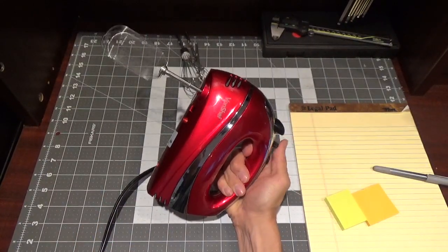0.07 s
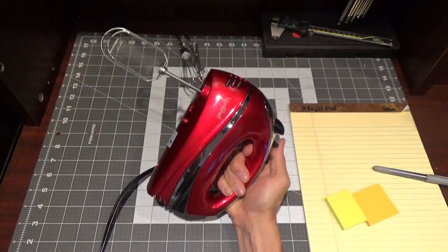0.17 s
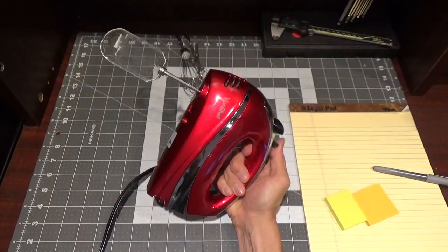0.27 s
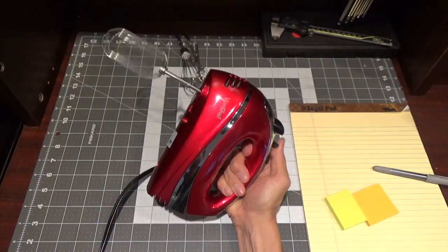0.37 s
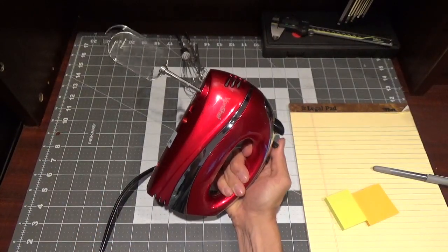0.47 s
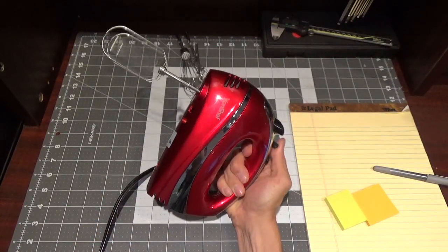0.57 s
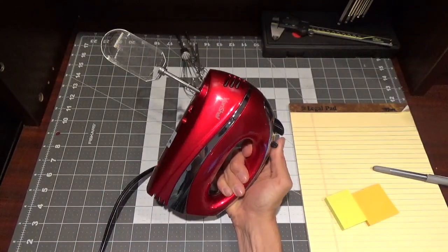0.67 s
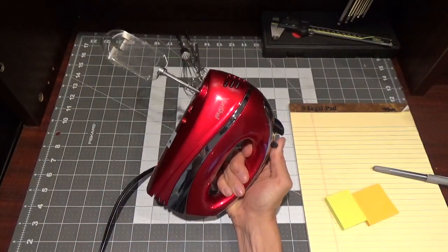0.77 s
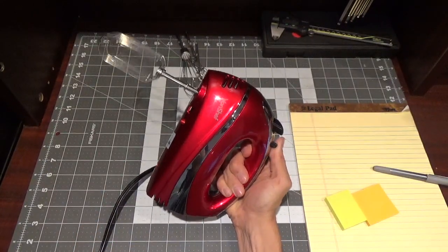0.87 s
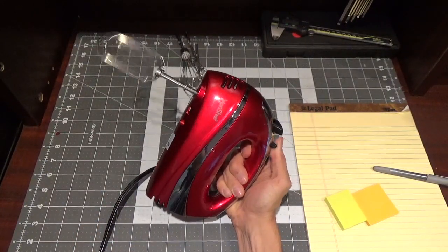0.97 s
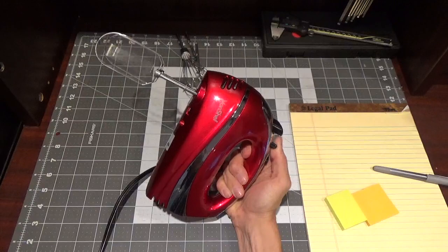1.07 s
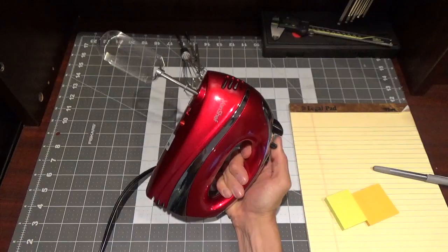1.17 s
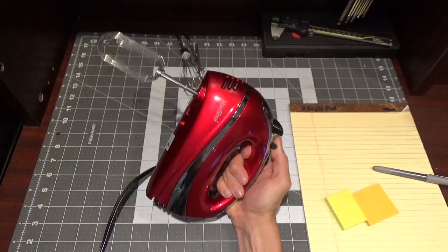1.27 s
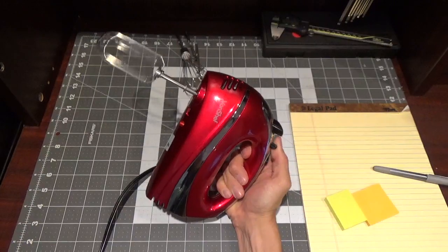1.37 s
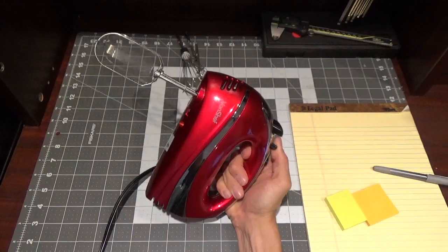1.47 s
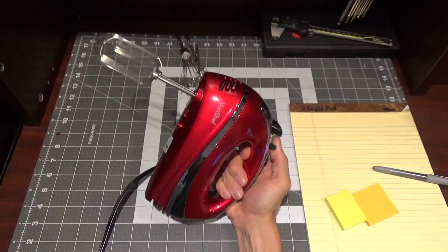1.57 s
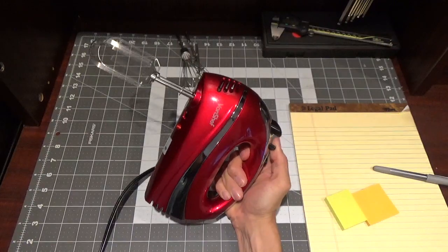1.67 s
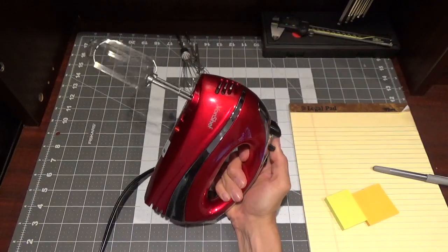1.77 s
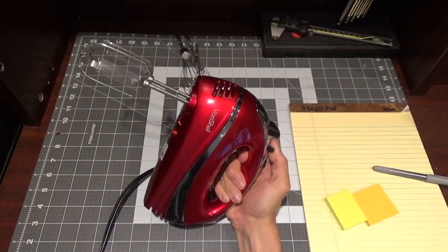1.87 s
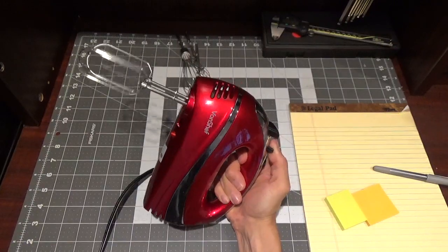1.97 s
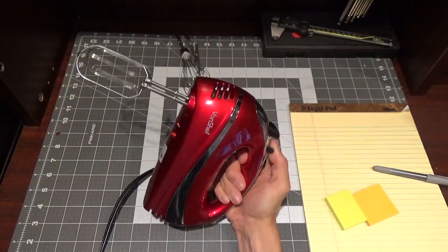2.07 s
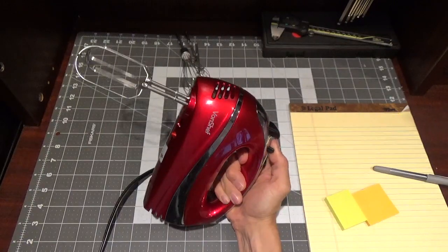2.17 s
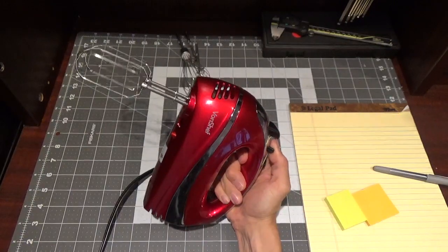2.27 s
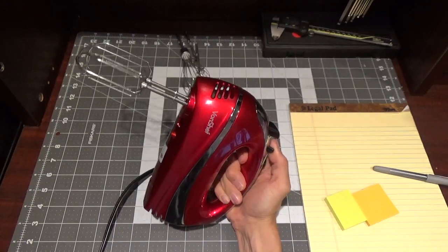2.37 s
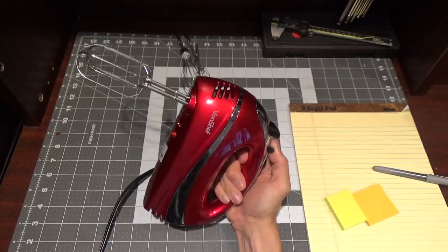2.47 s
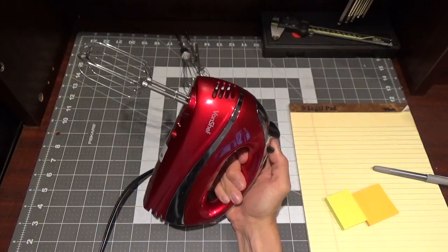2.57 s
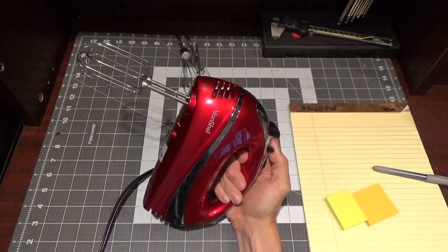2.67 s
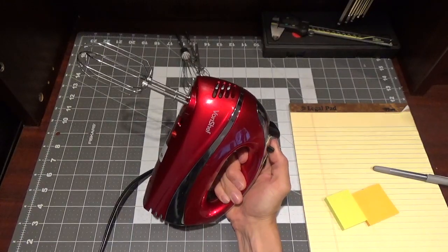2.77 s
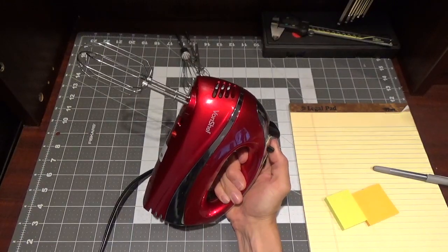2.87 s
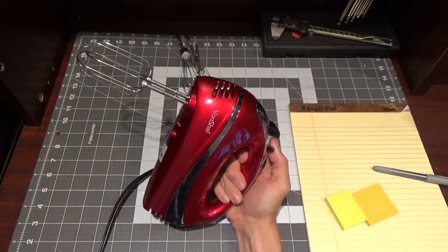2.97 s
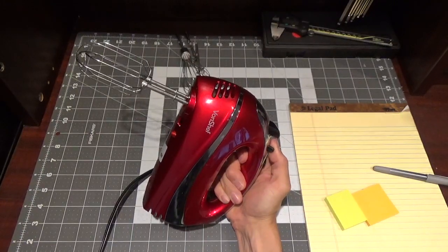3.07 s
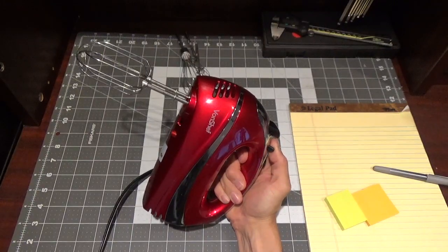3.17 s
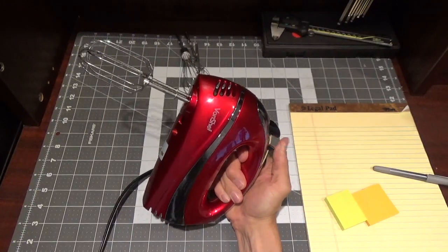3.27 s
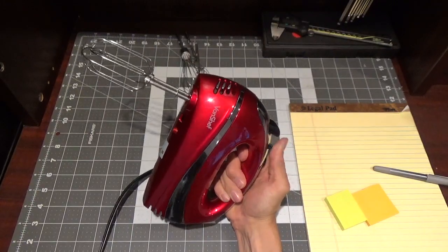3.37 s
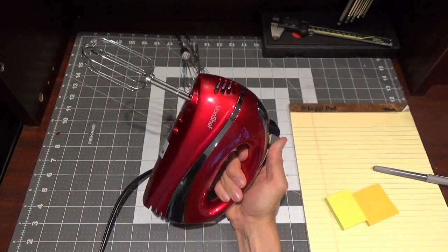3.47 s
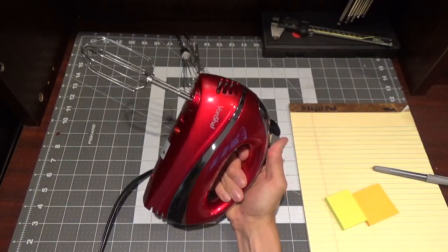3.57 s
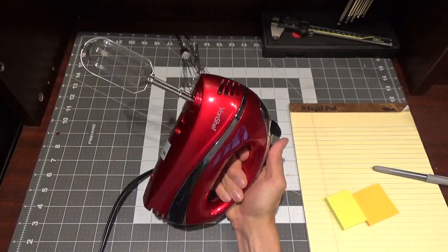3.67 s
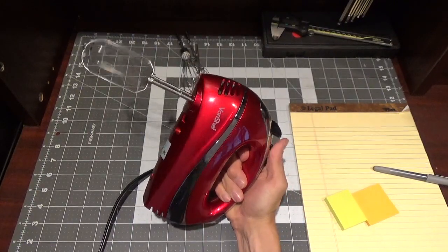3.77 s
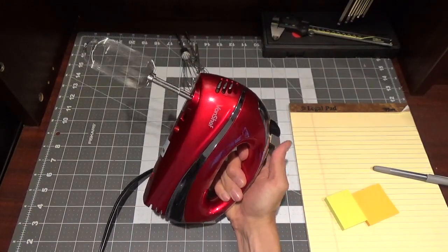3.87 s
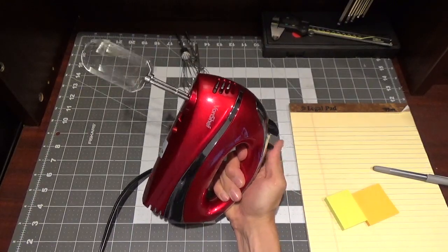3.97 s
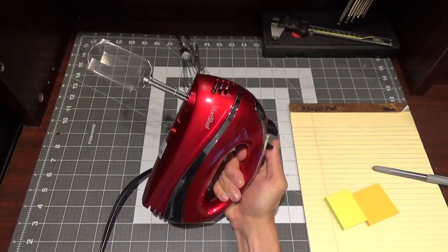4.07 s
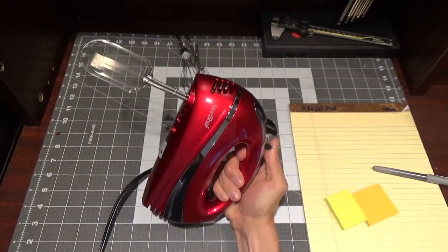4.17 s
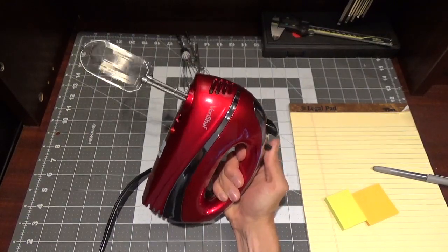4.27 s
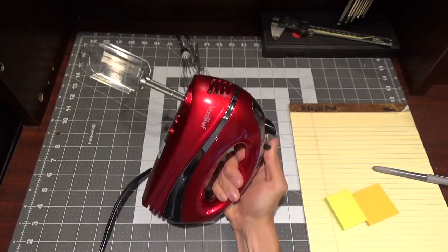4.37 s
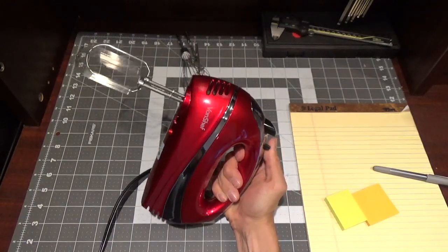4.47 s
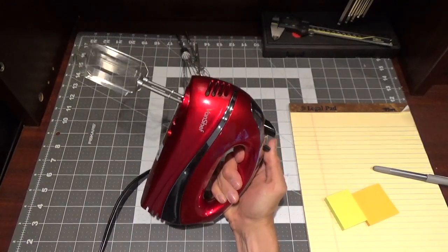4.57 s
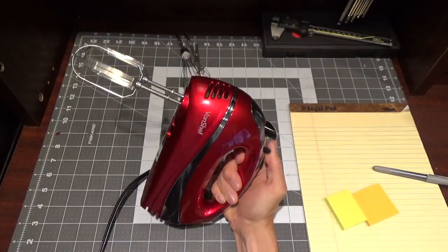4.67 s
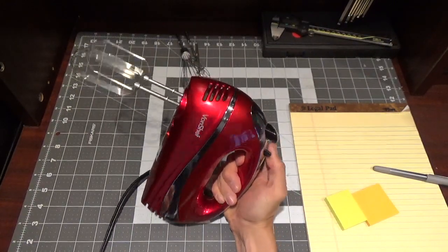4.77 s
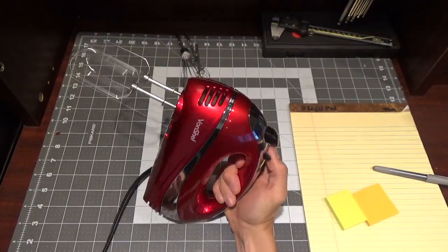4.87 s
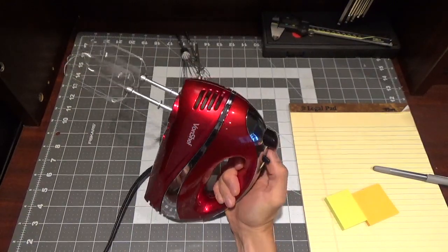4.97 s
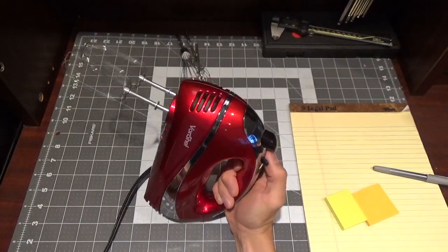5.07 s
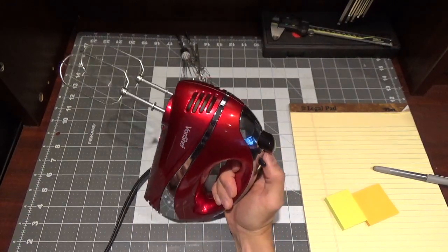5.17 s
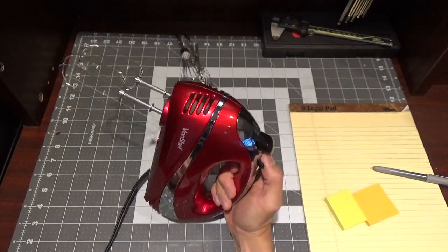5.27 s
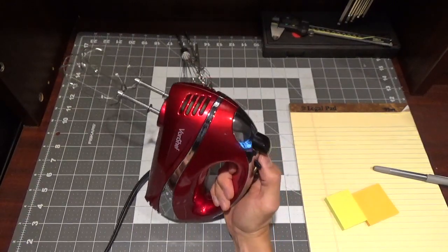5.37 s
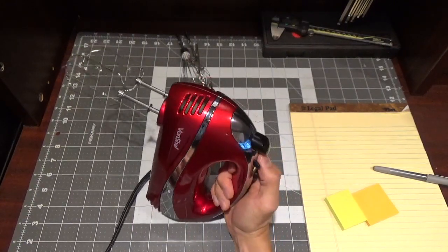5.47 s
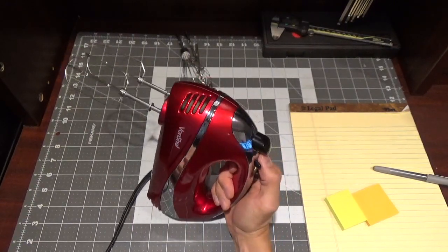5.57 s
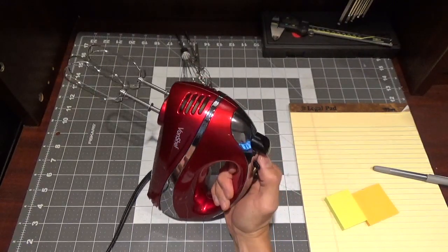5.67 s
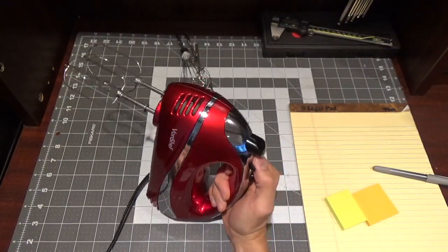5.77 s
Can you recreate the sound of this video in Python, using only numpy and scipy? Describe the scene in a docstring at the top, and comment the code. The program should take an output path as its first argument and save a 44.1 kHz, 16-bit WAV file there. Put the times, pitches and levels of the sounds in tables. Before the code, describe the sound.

A handheld electric mixer whirs at full speed, clicks off and whines down to rest, then is briefly switched on and coasts down again.

```python
"""In a small room, a hand-held kitchen mixer runs at full speed close to the microphone, is switched off and
coasts to rest; later it is switched on for half a second and coasts down again. Commutator and fan whine at
multiples of the rotor speed, the worm gear rattles the plastic housing, air rushes through the vents, brushes
scrape over the bars, and the wire beaters touch and ring. Noise, hum and faint ticking fill the background."""
import sys
import numpy as np
from scipy import signal
from scipy.fft import rfft, irfft, next_fast_len
from scipy.io import wavfile

SR = 44100
rng = np.random.default_rng(int(sys.argv[2]) if len(sys.argv) > 2 else 0)


def voltage_ratio(level):
    """Linear amplitude factor for a level in decibels (scalar or array-like)."""
    return 10 ** (np.asarray(level, float) / 20)


def wav_record(signal):
    """Record a signal, one row per channel, as 16-bit PCM in the file named by sys.argv[1]."""
    frames = np.transpose(np.atleast_2d(signal))
    bounded = np.clip(frames, -1, 1)
    # unit amplitude maps onto the largest positive 16-bit level
    quanta = np.round(bounded * 32767).astype(np.int16)
    wavfile.write(sys.argv[1], SR, quanta)


N = 257226
SIZE = next_fast_len(N + SR)  # transform length, with space for tails
HZ = np.arange(SIZE // 2 + 1) * SR / SIZE + 1e-3
TIME = np.arange(N) / SR  # seconds

MAINS_HZ = 60
SLOTS, FULL_SPEED = 12, 250  # rotor slots; reference speed in turns per s
REGRIP_S = 3.2  # the grip has changed from here on
START_SPEED, PULL_RISE_S = 248.35, .0368  # turns per s; time constant with which the pull builds up
PULL_HALVED_AT, PULL_FALL = 106.92, 2.1625  # turns per s; steepness of the fall with speed
FRICTION, DRAG, DRAG_POWER = 66.305, 3.1731, .6123  # braking in turns per s2 = friction + drag * speed ** power
STEP_S = .002  # step of the motion
GROWL_DB, GROWL_STEEP = -23, 7  # level at the strongest pull; how fast it fades as the pull eases
STRAIN_BLUR_DB = 4.5  # the whine loses this much at the strongest pull
SEATED_DB = 7.5  # pull takes up the play of the gear, which then rattles less
HUM_DB, HUM_STEEP = -33.5, 0.99  # level at a pull share of 1; exponent of the share
HUM_ENDS_S, HUM_FADE_S = 4.12, .02  # the thumb moves on from the low setting
SCRAPE_LATER_DB = 3.5  # the brush side turns towards the microphone
GRAZE_PER_S, GRAZE_DB = 50, -41  # GRAZE_DB is relative to the hiss level
TICK_PER_S, TICK_HZ, TICK_DB = 30, 3430, -58
ROOM_T60_S, ROOM_DB = 0.091, -9  # decay before the loss of treble; level
WALL_CUT_HZ = 12000  # treble corner of one round of 25 ms; shorter rounds cut higher
TOP_HZ = 11300

# Spectrum of the room noise. Each row: frequency in Hz, density in dB per Hz.
ROOM_NOISE = [(18, -30), (30, -3), (114, -6), (166, 0.5), (316, -2.5), (1060, -8.5), (1400, -5.5),
              (1930, -12), (3410, -12.5), (3760, -15.5), (10400, -22.5), (11200, -30.5), (14600, -68.5),
              (22000, -120)]
# Level of the room noise in dB.
ROOM_NOISE_DB = -60.5
# Mains hum in the room. Each row: frequency in Hz, level in dB rms.
ROOM_HUM = [(60, -71), (120, -70.5), (240, -73.5)]
# Balance of the mixer. Each row: time in seconds, left minus right in dB.
BALANCE = [(0.0, 2), (0.8, 1), (2.43, 0.5), (3.04, 1), (3.49, 0.5), (5.83, 1.5)]
# Spectrum of the rumble in the grip. Each row: frequency in Hz, density in dB per Hz.
RUMBLE = [(15, -69.5), (40, -30.5), (70, -9.5), (110, 0.5), (200, -18.5), (320, -3), (500, -14.5)]
# Shifts of the mixer in the hand. Each row: centre in seconds, level in dB, length in seconds.
SHIFTS = [(.69, -44, 0.069), (0.968, -35, 0.07), (1.174, -29.5, 0.049), (1.3, -31, 0.12),
          (4.095, -30, 0.038), (4.216, -40, 0.068), (4.438, -44, 0.042), (4.557, -32, 0.037),
          (5.805, -65, 0.038)]
# Short bursts: clicks of the speed switch, and at 3.624 s a fainter noise just ahead of a loud click.
# Each row: start in seconds, peak in dB, length in ms, tilt in dB per octave.
BURSTS = [(0.662, -15.5, 5, 10), (3.248, -53.5, 55, -4), (3.28, -49, 30, -2), (3.292, -41, 31, -4),
          (3.624, -22, 57, -4.5), (3.632, -8.5, 9.2, 5), (3.699, -12, 20.6, -4.5), (4.079, -11.5, 18, -1.5),
          (4.104, -6.5, 7, 1.5), (4.193, -6, 4.3, 0), (4.532, -10.5, 26, 0.5), (5.65, -37, 21, 1),
          (5.788, -40, 20, -14.5)]
# Resonances of the switch plastic. Each row: frequency in Hz, width in Hz, level in dB.
SWITCH_BODY = [(334, 48, -36), (460, 77, -6.5), (960, 106, 3.5), (1940, 250, 4), (2750, 210, 5.5),
               (3180, 270, 1.5), (3750, 170, 2.5), (4700, 210, 2.5), (5700, 400, -0.5), (7540, 800, -2),
               (8260, 300, -1), (10240, 730, 1.5), (10100, 370, -25)]
# Modes of the wire beaters. Each row: frequency in Hz, level in dB, decay by 60 dB in seconds.
WIRE_MODES = [(3713, -12, .2), (4942, -11, .25), (5930, -10, .14), (8392, -1, .13), (8630, -9, .12),
              (9160, -11, .1), (9985, -3, .18), (10370, -11, .15), (10540, -11, .15)]
# Beaters touching. Each row: time in seconds, peak in dB.
TOUCHES = [(0.383, -29), (.8, -32), (1.128, -15.5), (1.25, -16.5), (1.384, -23), (1.47, -25), (1.64, -52),
           (4.078, -22), (4.4, -23), (4.532, -22)]
# Spectrum of the vent rush. Each row: frequency in Hz, density in dB per Hz.
RUSH = [(150, -20.5), (400, -7.5), (800, -6.5), (1200, -7), (1600, -1.5), (2100, 2), (2700, -7), (4000, -7),
        (7000, -16.5), (11500, -33)]
# Spectrum of the brush hiss. Each row: frequency in Hz, density in dB per Hz.
HISS = [(1500, -16.5), (3000, 6), (4300, 4), (5200, 6), (6300, -4), (7500, -5.5), (9000, 5), (10500, 0.5),
        (11500, -3.5)]
# Resonances of the shell under the gear rattle. Each row: frequency in Hz, width in Hz, level in dB.
SHELL = [(214, 8.3, -8), (312, 35, -6.5), (389, 35, -13.5), (478, 28, 3), (575, 40, -1), (635, 35, -2),
         (1060, 70, -2), (1295, 60, -4), (1465, 86, -7.5), (1664, 12, -15), (1908, 13, -7), (2120, 17, -42)]
# Resonances of the brushes scraping over the bars. Each row: frequency in Hz, width in Hz, level in dB.
SCRAPE = [(6260, 340, 4.5), (6390, 1300, 2), (7280, 1260, -2.5), (10300, 280, -9.5)]
# Spectrum of the growl under load. Each row: frequency in Hz, density in dB per Hz.
GROWL = [(250, -31), (550, 0), (1000, 2), (1700, -4), (3000, -7.5), (5000, -21), (11000, -30)]
# Paths out through the housing. Each row: frequency in Hz, width in Hz, dB as first held, dB as held later.
HOUSING_PATHS = [(530, 580, 0, -4), (1090, 97, -3, 1.5), (1630, 82, -5.5, -1.5), (2090, 220, -2.5, -1.5),
                 (2534, 76, -0.5, -3), (2706, 138, -2.5, 4), (3280, 350, -7, 1), (3760, 80, -13, -8.5),
                 (4225, 200, -1.5, 0), (4990, 150, -15.5, -5), (5314, 40, 0.5, -7.5), (5505, 150, -13.5, 1),
                 (5813, 100, 2, 0), (6097, 316, -0.5, -3), (6500, 320, -14, -11), (7000, 120, -6, 0.5),
                 (7310, 400, 1.5, -3), (7820, 150, -4.5, 1), (8270, 130, -0.5, 1.5), (8610, 110, -8, -2),
                 (9190, 550, 0.5, 1.5), (9820, 140, 6.5, 2), (10180, 225, -10, 5)]
# Slot whine under power, by its pitch. Each row: frequency in Hz, level in dB.
SLOT_WHINE = [(300, -67), (500, -34), (720, -30.5), (950, -22), (1250, -31), (1500, -25), (1720, -30.5),
              (1900, -41.5), (2150, -29), (2330, -37), (2500, -39.5), (3100, -35.5)]
# Whine partials as multiples of the rotor speed (10 fan blades, 12 slots).
MULTIPLES = [1, 5, 10, 24, 31, 36, 40, 42, 48, 53, 55, 60, 65, 72, 84, 96, 108, 120, 132, 144, 156, 168,
             180, 192]
# Strength of each multiple. Each row: dB at the reference speed, dB lost per halving of speed.
STRENGTHS = [(3, 13.5), (-29.5, 4.5), (-2, 9), (-6.5, 3.5), (-22.5, 11.5), (-3.5, -1), (-28.5, -0.5),
             (-37.5, 0.5), (-2.5, 0.5), (-18.5, 4), (-40, 15.2), (-6.5, -0.5), (-35, 5), (-1.5, 3), (-8, 2),
             (-11.5, 1.5), (-12.5, 1), (-12.5, 0), (-21, -3.5), (-18, 2), (-20, -1), (-29, -4), (-42, -4),
             (-27, 4)]
# Current flows. Each row: on in seconds, off in seconds, pull at standstill in turns per s2.
POWER_ON = [(-1, .66, 1295.9), (3.6205, 4.19, 1386.4)]
# Layer levels by rotor speed. Each row: speed in turns per s, then whine, gear rattle, vent rush, brush hiss
# and rumble in the hand, each in dB.
BY_SPEED = [(0, -79, -88, -82, -84, -67.5), (8, -66, -66.5, -63.5, -62.5, -57),
            (22.5, -40, -66, -54.5, -55, -57), (34.2, -36.5, -55.5, -48, -47.5, -64),
            (46.7, -33, -48, -47, -42.5, -51), (62.3, -28, -42, -47.5, -36.5, -57),
            (94.4, -22.5, -37.5, -36.5, -39, -52.5), (122.7, -21.5, -33, -33.5, -34.5, -49),
            (153.3, -18.5, -31, -27.5, -28.5, -47), (195, -19, -29, -19.5, -24.5, -50),
            (232, -15, -29, -19, -18, -53.5), (281, -16.5, -26.5, -18.5, -19, -60)]
# Change in dB of the same five layers as held later.
LATER_GRIP_DB = [-2.5, -1, -2, -2, 5.5]


def rms_one(x):
    """Normalization: the mean power becomes one."""
    return x / np.sqrt(np.mean(x ** 2) + 1e-20)


def in_time(rows):
    """Linear interpolation of every column over the time in the first."""
    s, *columns = np.transpose(rows)
    return [np.interp(TIME, s, column) for column in columns]


def through(x, response):
    """Linear filtering: the spectrum is multiplied by the frequency response."""
    return irfft(rfft(x, SIZE) * response, SIZE)[..., :N]


def colour(points):
    """Spectral envelope: decibels joined by straight lines over log frequency."""
    hz, db = np.transpose(points)
    return voltage_ratio(np.interp(np.log(HZ), np.log(hz), db))


def resonances(modes, sign=-1):
    """Parallel resonators, each of its listed peak gain; alternating signs fill valleys, equal signs leave nulls."""
    total = 0
    for k, (hz, wide, db) in enumerate(modes):
        damping = 1j * HZ * wide
        total = total + sign ** k * voltage_ratio(db) * damping / (hz ** 2 - HZ ** 2 + damping)
    return total


def drift(rate):
    """Slow random modulation: normal deviates, `rate` per second, joined by lines."""
    knots = rng.standard_normal(600)
    return np.interp(TIME * rate, np.arange(len(knots)), knots)


def noise(response, patchy_db=4.5):
    """Filtered white noise brought to rms 1, then given a flickering level."""
    return rms_one(through(rng.standard_normal(N), response)) * voltage_ratio(patchy_db * drift(12))


def ring(clicks, hz, t60):
    """Damped oscillator: a pole pair answers each click with a decaying sine."""
    radius, angle = voltage_ratio(-60 / (t60 * SR)), 2 * np.pi * hz / SR
    return signal.lfilter([0, np.sin(angle)], [1, -2 * radius * np.cos(angle), radius ** 2], clicks + 1e-18)


def background():
    """Superposition of partly correlated stereo noise, wavering mains harmonics and regular resonant ticks."""
    middle, side = rms_one(through(rng.standard_normal((2, N)), colour(ROOM_NOISE)))
    air = voltage_ratio(ROOM_NOISE_DB) * (middle + 0.64 * side * np.array([[1], [-1]]))
    hum = 0
    for hz, db in ROOM_HUM:
        hum = hum + np.sqrt(2) * voltage_ratio(db + 4.7 * drift(13)) * np.sin(2 * np.pi * hz * TIME)
    ticks = np.diff(np.floor(TIME * TICK_PER_S + 0.16), prepend=0) * voltage_ratio(TICK_DB + 3 * drift(44))
    return air + hum + ring(ticks, TICK_HZ, 0.021)


def room(x):
    """Reverberation by recirculation: eight feedback delays a side, duller on every round."""
    sides = []
    for lags in rng.uniform(.006, .03, (2, 8)):  # seconds
        response = 0
        for k, lag in enumerate(lags):
            wall = 1 / (1 + 1j * HZ / WALL_CUT_HZ * lag * 40)
            loop = voltage_ratio(-60 * lag / ROOM_T60_S) * np.exp(-2j * np.pi * HZ * lag) * wall
            response = response + (-1) ** k * loop / (1 - loop)
        sides.append(through(x, response))
    return np.array(sides)


def hand(rumble_db):
    """Contact noise: rumble in the grip swells whenever the mixer shifts."""
    swell = sum(voltage_ratio(db) * np.exp(-2 * ((TIME - s) / length) ** 2) for s, db, length in SHIFTS)
    return (voltage_ratio(rumble_db) + swell) * noise(colour(RUMBLE), patchy_db=2.5)


def short_bursts():
    """Source and filter: short dying noise bursts, the switch clicks and a faint noise leading into a loud one,
    take on plastic resonances and a bright or dull tilt."""
    out, step = np.zeros(N), SIZE // 8192  # a coarser spectrum is enough for short bursts
    body = (resonances(SWITCH_BODY) + 0.091)[::step]
    octaves = np.log2(HZ[::step] / 3000 + 0.094)
    t = np.arange(len(body)) / SR
    for s, db, ms, tilt_db in BURSTS:
        start = round(s * SR)
        envelope = np.exp(-2000 * t / ms) * np.minimum(1, 4000 * t / ms)
        burst = rng.standard_normal(len(t)) * envelope
        burst = irfft(rfft(burst, 2 * len(t) - 2) * body * voltage_ratio(tilt_db * octaves))
        burst = burst[:min(len(t), N - start)]
        peak = 3 * np.sqrt(np.mean(burst[:round(ms * SR / 2000)] ** 2))  # estimated from the rms
        out[start:][:len(burst)] += voltage_ratio(db) * burst / peak
    return out


def beaters(hiss_db):
    """Modal excitation: touches and a dense grazing strike every wire mode with a strength of its own."""
    at, out = [round(s * SR) for s, db in TOUCHES], 0
    touch_db = np.array(TOUCHES)[:, 1]
    graze = (rng.random(N) < GRAZE_PER_S / SR) * voltage_ratio(GRAZE_DB + hiss_db)
    for hz, level_db, t60 in WIRE_MODES:
        clicks = graze * rng.standard_normal(N)
        clicks[at] += voltage_ratio(touch_db + rng.normal(0, 1.3, len(at)))
        out = out + voltage_ratio(level_db) * ring(clicks, hz, t60)
    return out


def housing(x, leak_db):
    """Transmission through resonant paths; the grip changes in the pause, and with it which face the microphone."""
    hz, wide, *grips = np.transpose(HOUSING_PATHS)
    first, later = [through(x, voltage_ratio(leak_db) + resonances(zip(hz, wide, db), sign=0.96)) for db in grips]
    return np.where(TIME < REGRIP_S, first, later)


def vent_air(rush_db, hiss_db):
    """Broadband radiation: vent rush and brush hiss, mostly straight out of the vents, partly by the housing."""
    air = voltage_ratio(rush_db) * noise(colour(RUSH), patchy_db=2.0)
    air = air + voltage_ratio(hiss_db) * noise(colour(HISS), patchy_db=-0.5)
    return 0.53 * air + 0.39 * housing(air, leak_db=-46.5)


def gears(speed, per_turn=5.5, size_db=1.5):
    """Random impacts: teeth of the worm gear knock unevenly, a few times a turn, into the resonant shell."""
    struck = rng.random(N) < per_turn * (speed + 20) / SR
    knocks = struck * voltage_ratio(size_db * np.minimum(rng.exponential(1, N), 4)) * rng.choice([-1, 1], N)
    knocks = knocks / np.sqrt(speed + 20)  # evens out the power as knocks grow denser
    return rms_one(through(knocks, resonances(SHELL) / (1 + (250 / HZ) ** 2)))


def brushes(speed, hiss_db, slow_db=-3, loss_db=3.0, sharp=0.64):
    """Amplitude modulation: a scrape at every bar, uncovered as the air noise dies with speed."""
    bars = np.exp(sharp * np.cos(2 * np.pi * SLOTS * np.cumsum(speed) / SR))
    scrape = rms_one(through(rng.standard_normal(N) * bars, resonances(SCRAPE)))
    return scrape * voltage_ratio(hiss_db + slow_db - loss_db * np.log2(np.maximum(speed, 60) / 60))


def load_growl(pull):
    """Load noise: it fades steeply as the pull eases and pulses at twice the mains frequency."""
    pulses = 1 + 0.34 * np.sin(4 * np.pi * MAINS_HZ * TIME)
    return voltage_ratio(GROWL_DB) * (pull / pull.max()) ** GROWL_STEEP * pulses * noise(colour(GROWL), patchy_db=1.5)


def motor_hum(pull):
    """Magnetic force follows current squared: hum at twice the mains frequency, heard on the low setting."""
    fade = np.clip((TIME - HUM_ENDS_S) / HUM_FADE_S * 2, -50, 50)
    low_setting = (TIME > REGRIP_S) / (1 + np.exp(fade))
    twice_mains = 4 * np.pi * MAINS_HZ * TIME
    tone = np.sin(twice_mains) + 0.31 * np.sin(2 * twice_mains)
    return voltage_ratio(HUM_DB) * pull ** HUM_STEEP * low_setting * tone


def motor():
    """Equation of motion: pull falls with speed, friction and drag brake; gives speed and share of full pull."""
    speed, rows = START_SPEED, []
    for s in np.arange(0, N / SR + STEP_S, STEP_S):
        share, pull = 0., 0.
        for on, off, full in POWER_ON:
            if on < s < off:
                built_up = 1 - np.exp((on - s) / PULL_RISE_S)
                share = built_up / (1 + (speed / PULL_HALVED_AT) ** PULL_FALL)
                pull = share * full
        rows.append((s, speed, share))
        speed = max(0., speed + STEP_S * (pull - FRICTION - DRAG * speed ** DRAG_POWER))
    return in_time(rows)


def slot_level(speed, pull):
    """Frequency-dependent forced response: slot whine in dB by its pitch, while current flows."""
    hz, db = np.transpose(SLOT_WHINE)
    return np.where(pull > 0, np.interp(np.log(SLOTS * speed + 1), np.log(hz), db), -100)


def whine(speed, whine_db, slot_db, wobble=.03, flicker_db=2.6, uneven_db=-29, rough=.55):
    """Order synthesis: near sines locked to the rotor angle, with a pattern of unequal bars repeating each turn."""
    turns = np.cumsum(speed) / SR + wobble * drift(60) / (2 * np.pi)
    octaves = np.log2((speed + 5) / FULL_SPEED)
    partials = 0
    for order, (db, loss_db) in zip(MULTIPLES, STRENGTHS):
        audible = order * speed < SR / 3  # keeps clear of aliasing
        level = audible * voltage_ratio(db + loss_db * octaves + flicker_db * drift(25))
        partials = partials + level * np.sin(2 * np.pi * (order * turns + rng.random()))
    # Unequal bars add a little of each multiple up to the 120th.
    bars = np.exp(2j * np.pi * rng.random(120)) * voltage_ratio(rng.normal(0, 3, 120))
    one_turn = irfft(np.r_[0, bars], 4096) * 2048
    partials = partials + voltage_ratio(uneven_db) * np.interp(turns % 1, np.linspace(0, 1, len(one_turn)), one_turn)
    torque = 1 + .8 * np.sin(4 * np.pi * MAINS_HZ * TIME)  # pulses at twice the mains
    torque = torque + rough * noise(1 / (1 + (HZ / 450) ** 2))  # and the loaded rotor shudders
    slot_tone = np.sin(2 * np.pi * SLOTS * turns) + 0.26 * np.sin(4 * np.pi * SLOTS * turns)
    slots = voltage_ratio(slot_db + 1.1 * drift(60)) * torque * slot_tone
    small_source = HZ ** 2 / (HZ ** 2 + 1900 ** 2)  # brushes and blades radiate low pitches poorly
    partials = through(voltage_ratio(whine_db) * partials, small_source)
    return housing(partials, leak_db=-33.0) + housing(slots, leak_db=-1.5)


def scene():
    """Superposition: rotor speed and pull govern the layers of the mixer, which sounds directly and by the room."""
    speed, pull = motor()
    strain = pull / pull.max()
    later = TIME > REGRIP_S
    speeds, *levels = np.transpose(BY_SPEED)
    whine_db, gear_db, rush_db, hiss_db, rumble_db = [
        np.interp(speed, speeds, db) + later_db * later * (speed > 0)
        for db, later_db in zip(levels, LATER_GRIP_DB)]
    mixer = hand(rumble_db) + short_bursts() + beaters(hiss_db)
    mixer = mixer + vent_air(rush_db, hiss_db)
    mixer = mixer + voltage_ratio(gear_db - SEATED_DB * strain + 1.0 * drift(14)) * gears(speed)
    mixer = mixer + brushes(speed, hiss_db + SCRAPE_LATER_DB * later)
    mixer = mixer + load_growl(pull) + motor_hum(pull)
    mixer = mixer + whine(speed, whine_db - STRAIN_BLUR_DB * strain, slot_level(speed, pull))
    balance_db, = in_time(BALANCE)
    direct = mixer * voltage_ratio(balance_db * np.array([[.5], [-.5]]))
    return background() + voltage_ratio(ROOM_DB) * room(mixer) + direct


def band_limit(x):
    """A steep low-pass at the top of the band."""
    return signal.sosfilt(signal.butter(12, 11950, fs=SR, output="sos"), x)


def record(dry):
    """Low-pass filtering: a steep Chebyshev filter removes the top of the spectrum."""
    lowpass = signal.cheby2(22, 45, TOP_HZ, fs=SR, output="sos")
    mix = signal.sosfilt(lowpass, dry)
    return band_limit(mix)


dry = scene()
out = record(dry)
wav_record(out)
```